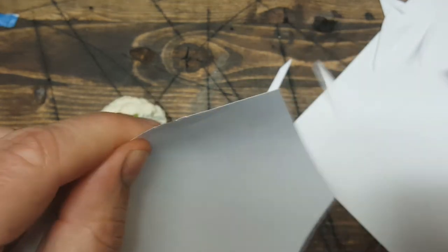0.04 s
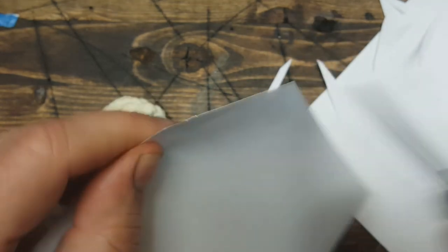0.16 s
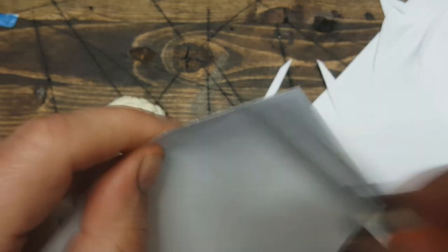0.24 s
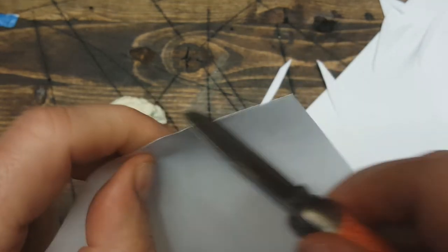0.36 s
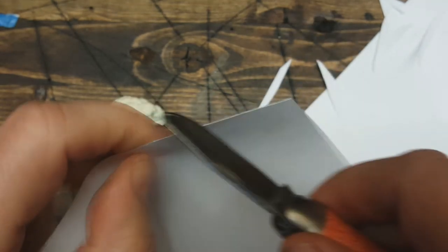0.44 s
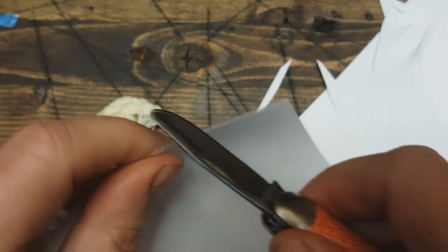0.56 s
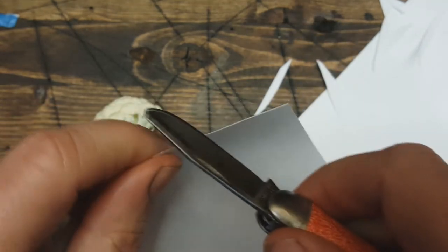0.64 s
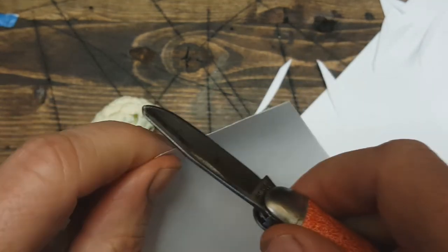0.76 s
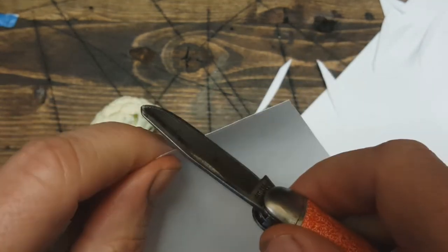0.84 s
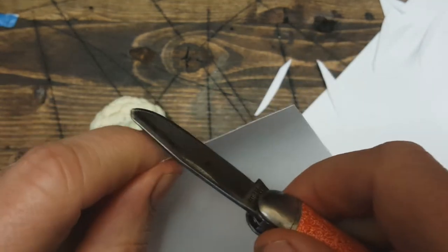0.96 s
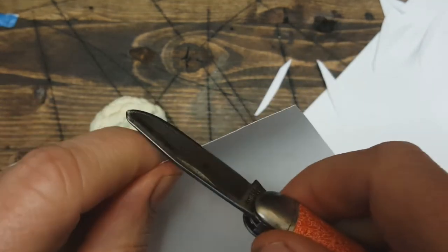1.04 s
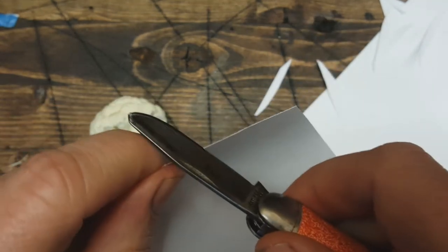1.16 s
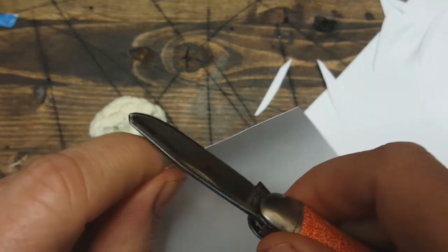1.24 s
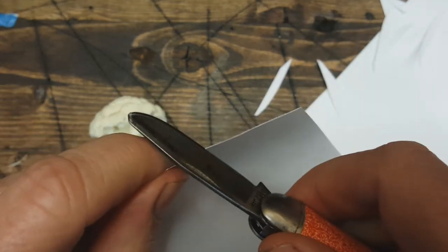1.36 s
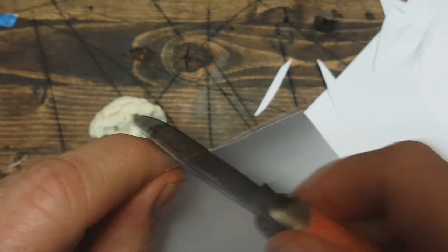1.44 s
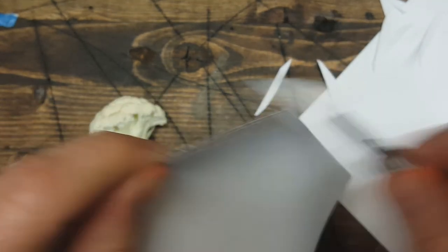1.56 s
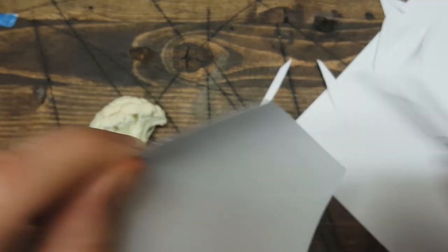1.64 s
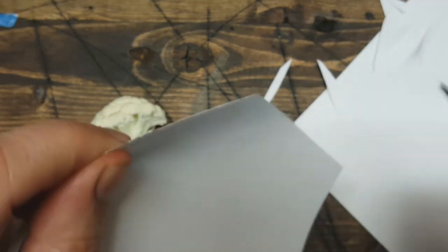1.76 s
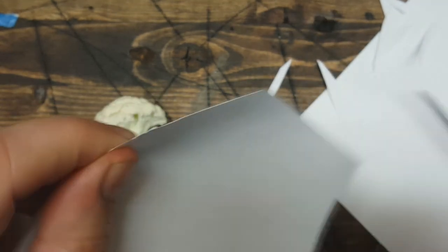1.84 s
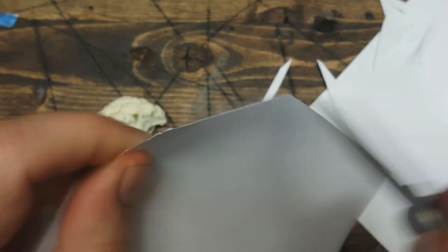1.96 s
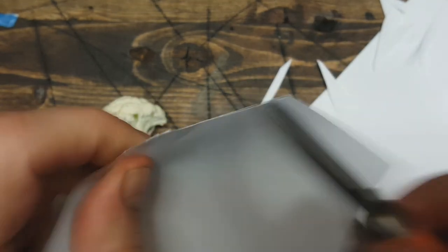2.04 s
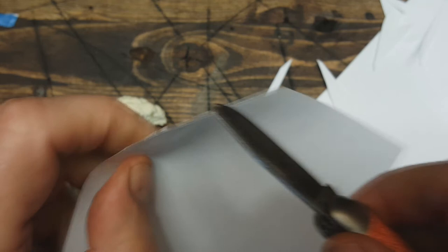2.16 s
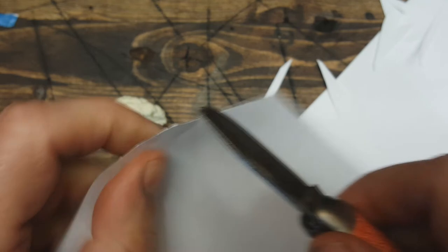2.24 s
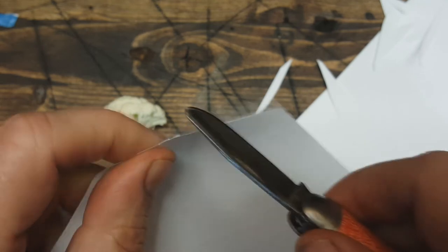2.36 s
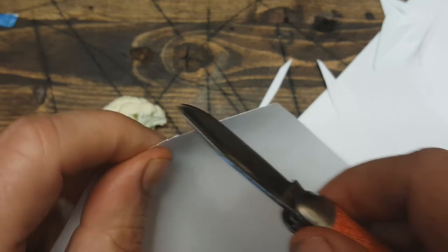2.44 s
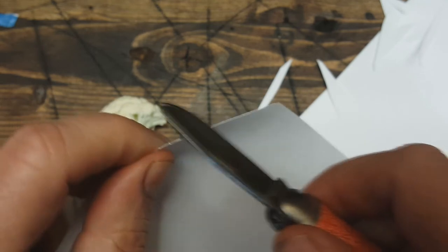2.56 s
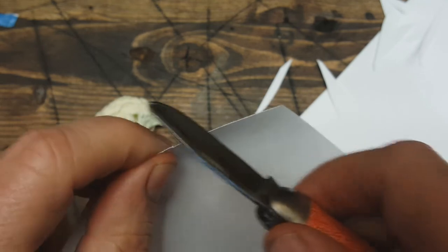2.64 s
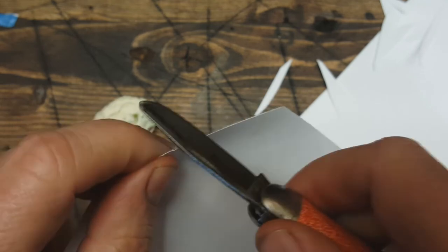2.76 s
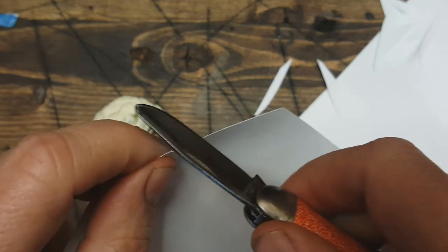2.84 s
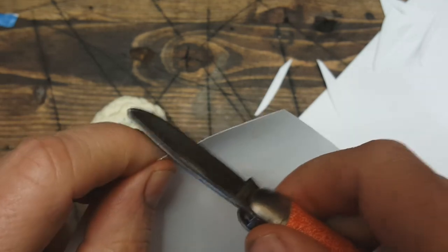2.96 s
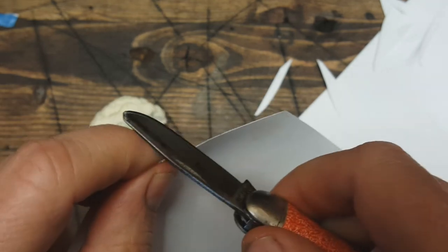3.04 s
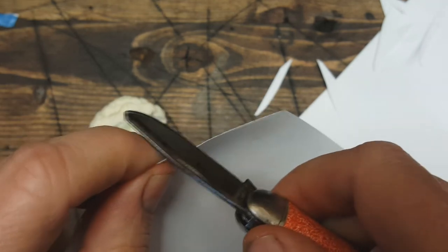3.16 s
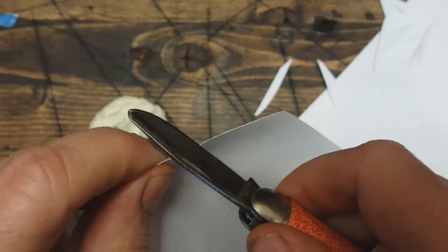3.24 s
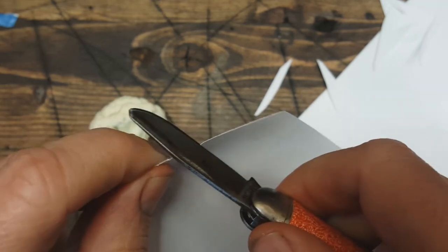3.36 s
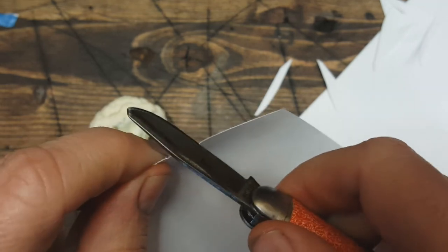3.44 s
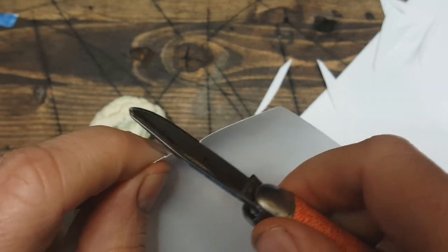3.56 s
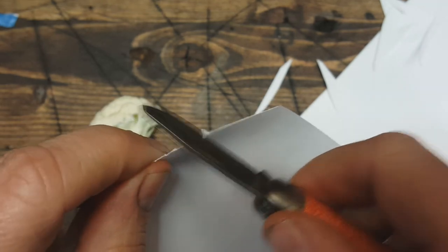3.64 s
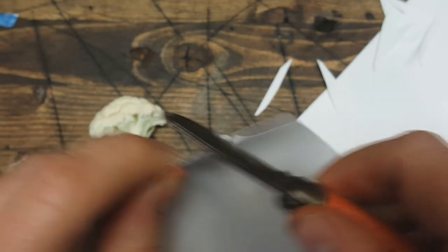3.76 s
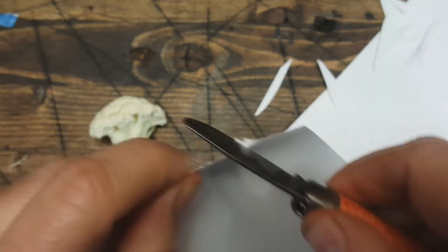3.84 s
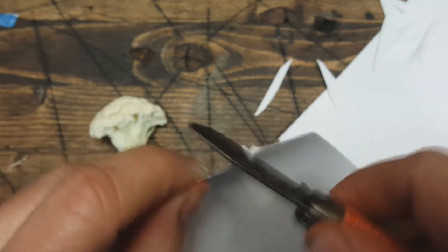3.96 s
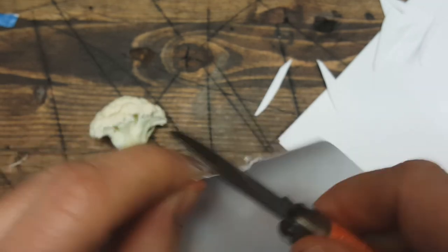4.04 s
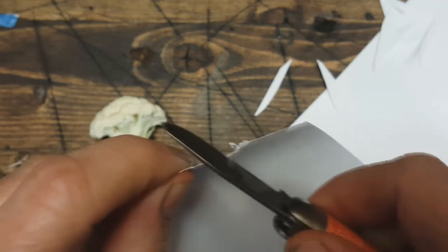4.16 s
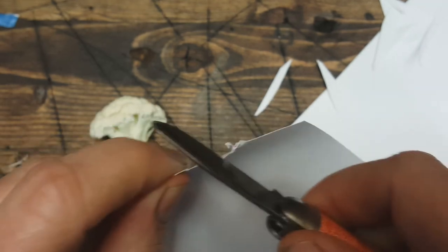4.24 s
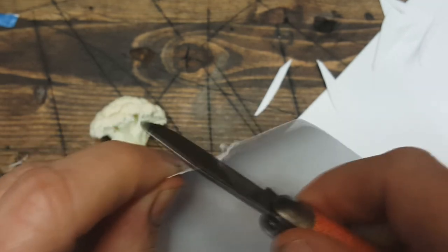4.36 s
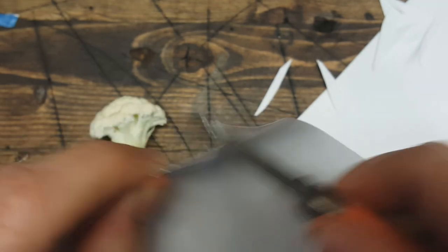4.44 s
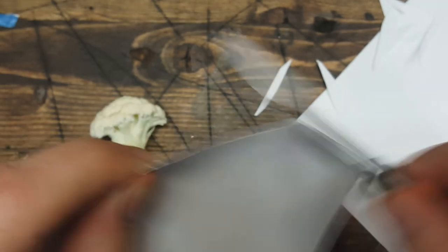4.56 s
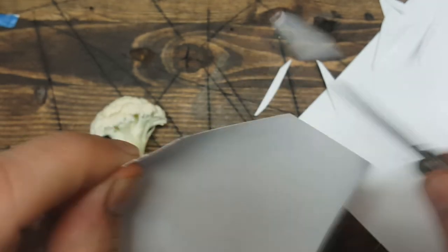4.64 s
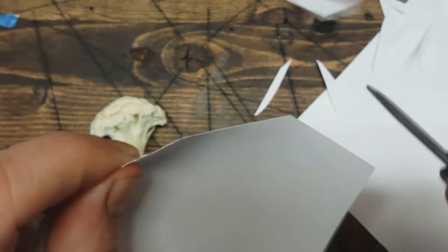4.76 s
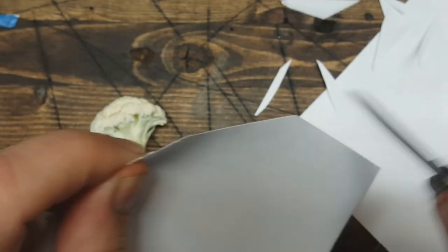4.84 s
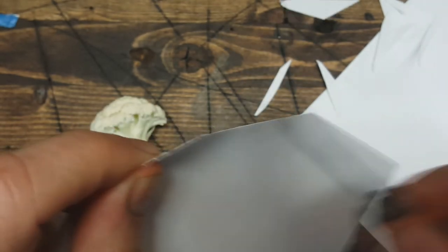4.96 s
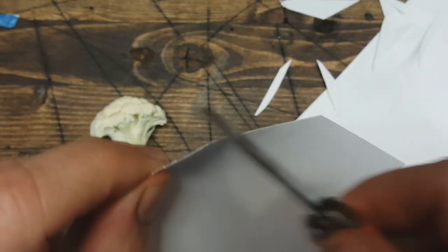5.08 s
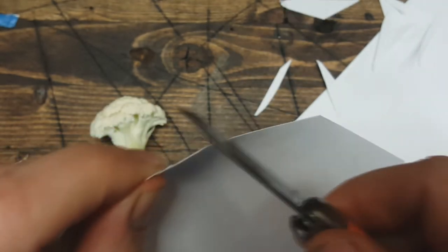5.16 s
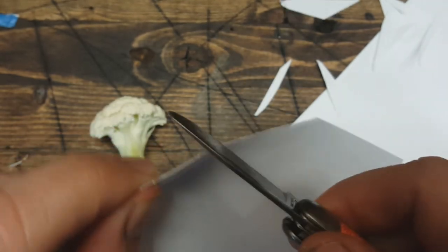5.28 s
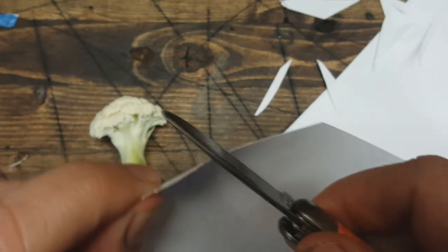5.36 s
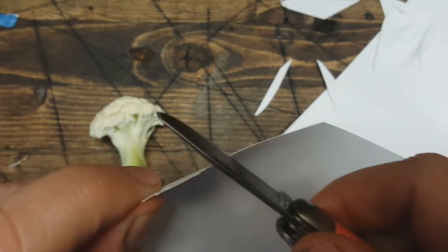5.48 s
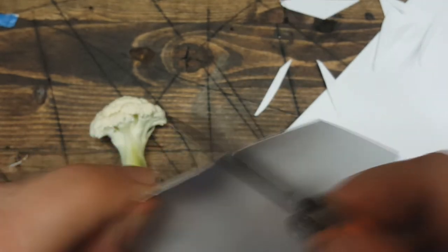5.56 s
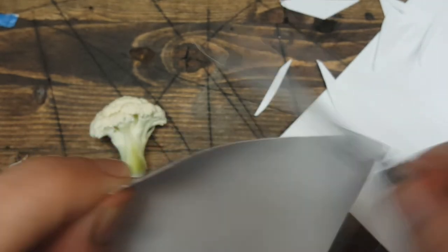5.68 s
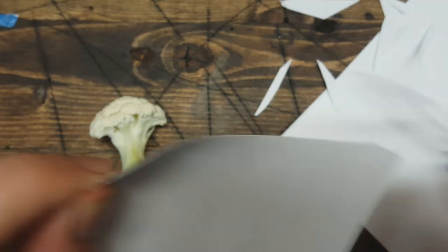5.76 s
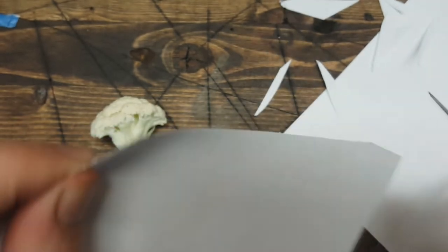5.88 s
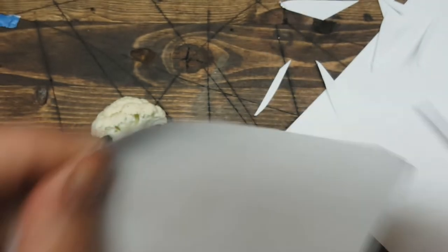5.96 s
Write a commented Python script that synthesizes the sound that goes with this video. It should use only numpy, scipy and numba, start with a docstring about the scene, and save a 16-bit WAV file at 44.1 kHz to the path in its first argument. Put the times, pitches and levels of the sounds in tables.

```python
"""A pocket knife slices strips off a hand-held sheet of paper over a wooden bench, close to a phone.
The edge snaps fibres: a dense random crackle that the sheet radiates with an uneven spectrum.
Between strokes fingers and blade slide on the sheet, tick it in short bursts and knock low modes.
A small room rings briefly (decaying noise bands) over shaped-noise rumble, tyre noise and wavering hums."""
import sys
import numpy as np
from scipy import signal
from scipy.fft import rfft, irfft
from scipy.io import wavfile
from scipy.ndimage import uniform_filter1d
from numba import njit

SR = 44100
rng = np.random.default_rng(int(sys.argv[2]) if len(sys.argv) > 2 else 0)


def digitize_waveform(pressure):
    """Quantize a signal to 16-bit integers and store it at the path in sys.argv[1].

    Rows of a 2-D input are taken as channels; values are limited to [-1, 1].
    """
    field = np.atleast_2d(pressure).T
    bounded = np.clip(field, -1, 1)
    quanta = np.round(bounded * 32767).astype(np.int16)
    wavfile.write(sys.argv[1], SR, quanta)


N = 265129
T = np.arange(N) / SR  # s

# Force spectrum of slides and ticks: (frequency [Hz], density [dB per Hz])
SLIDE_COLOUR = [(120, -37), (250, -22), (580, -12), (1300, -16), (1900, -5), (3000, 0), (4000, -5),
                (6000, -12), (8500, -18.5), (11000, -21), (15700, -37)]


def undb(db):
    """Decibels to gain."""
    return 10 ** (np.asarray(db) / 20)


def unit(x):
    """Scale to rms 1."""
    return x / np.sqrt(np.mean(x ** 2))


def on_log(hz, points):
    """Read (Hz, value) points on a log frequency axis."""
    point_hz, values = np.transpose(points)
    return np.interp(np.log(np.maximum(hz, 1)), np.log(point_hz), values)


def walk(rate_hz):
    """Random levels held 1 / rate_hz s and slewed; rms 1."""
    held = rng.standard_normal(N)[(T * rate_hz).astype(int)]
    return unit(uniform_filter1d(held, max(int(SR / rate_hz), 2)))


@njit
def svf(x, hz, width_hz):
    """State-variable band-pass with a moving centre, gain 1 at the centre."""
    y, band, low = np.empty(len(x)), 0., 0.
    for i in range(len(x)):
        g, k = np.tan(np.pi * hz[i] / SR), width_hz / hz[i]
        v = (band + g * (x[i] - low)) / (1 + g * (g + k))
        low += 2 * g * v
        band = 2 * v - band
        y[i] = k * v
    return y


def background():
    """Rumble, tyre noise and hiss as shaped noise; the low parts swell slowly and flicker."""
    # Noise spectrum: (frequency [Hz], density [dB per Hz])
    spectrum = [(15, -50), (30, -21.5), (50, -17), (80, -5), (140, -7.5), (260, -19), (500, -26),
                (900, -29), (1400, -30.5), (2000, -30.5), (3100, -33), (3900, -40), (6000, -43.5),
                (10000, -44.5), (15700, -48)]
    # Outdoor rumble swell: (time [s], level below 250 Hz [dB], level 250-1500 Hz [dB])
    swell = [(0, 2, 4), (1, 2, 3), (2, 1, 6), (2.998, 2.5, 4), (4, 3, 8.5), (4.799, 4.5, 10.5),
             (5.2, 7, 12.5), (5.5, 10, 12), (6.02, 6.5, 11)]
    level_db = -57.5
    hz = np.linspace(0, SR / 2, N // 2 + 1)
    noise = rfft(rng.standard_normal(N)) * undb(on_log(hz, spectrum))
    noise = noise / np.sqrt(np.mean(irfft(noise, N) ** 2))
    below_250 = 1 / (1 + (hz / 250) ** 6)
    below_1500 = 1 / (1 + (hz / 1500) ** 4)
    s, bass_points_db, mid_points_db = np.transpose(swell)
    bass_db, mid_db = np.interp(T, s, bass_points_db), np.interp(T, s, mid_points_db)
    out = irfft(noise * below_250, N) * undb(bass_db + 1.267 * walk(3))
    out += irfft(noise * (below_1500 - below_250), N) * undb(mid_db + 2.0 * walk(9))
    out += irfft(noise * (1 - below_1500), N) * undb(0.311 * mid_db)
    # tyre noise of distant traffic stands out when the rumble swells
    tyres = unit(svf(rng.standard_normal(N), 760 * (1 + .08 * walk(5.9)), 210.0))
    out += tyres * undb(-24.0 + 1.9 * mid_db + 2.0 * walk(6.6))
    return undb(level_db) * out


def hums():
    """Low gliding tones that swell, fade and waver slightly in level and pitch."""
    # Hums: (start [s], length [s], first pitch [Hz], last pitch [Hz], level at mid-swell [dB rms])
    hum_rows = [(0, 0.67, 138.8, 142.2, -58), (2.205, 0.93, 137.6, 142.4, -53), (4.85, 0.12, 84, 80.2, -54),
                (5.046, 0.43, 123.8, 126, -53), (5.513, 0.98, 123, 126.7, -50)]
    swell_power = 0.54  # exponent of the half-sine swell
    waver_hz, waver_db = 1.486 * walk(8.9), 1.5 * walk(8.3)
    out = 0
    for s, length_s, first_hz, last_hz, db in hum_rows:
        done = np.clip((T - s) / length_s, 0, 1)
        pitch_hz = first_hz + (last_hz - first_hz) * done + waver_hz
        phase = 2 * np.pi * np.cumsum(pitch_hz) / SR
        swell = np.abs(np.sin(np.pi * done)) ** swell_power
        out = out + np.sqrt(2) * swell * undb(db + waver_db) * np.sin(phase)
    return out


def crackle(rate_hz, spread_db, patchy_db, patch_rate_hz):
    """Fibres let go at random moments with uneven strength, in patches."""
    strength = undb(spread_db * rng.exponential(size=N))
    snaps = (rng.random(N) < rate_hz / SR) * rng.choice([-1, 1], N) * strength
    return unit(snaps * undb(patchy_db * walk(patch_rate_hz)))


def split(hz):
    """Gains of four neighbouring bands, low to high; their powers sum to 1."""
    # Band edges: [Hz]
    edges_hz = 1500, 3700, 6600
    below = [0 * hz] + [1 / (1 + (hz / f) ** 12) for f in edges_hz] + [0 * hz + 1]
    return np.sqrt(np.clip(np.diff(below, axis=0), 0, 1))


def causal(gain):
    """Minimum-phase response of unit energy with the shape of the gain curve."""
    size = 2 * (len(gain) - 1)
    cepstrum = irfft(np.log(gain + 1e-4 * gain.max()))
    cepstrum[1:size // 2] *= 2
    cepstrum[size // 2 + 1:] = 0
    return unit(irfft(np.exp(rfft(cepstrum)))) / np.sqrt(size)


def sheet(force, parts_db, colour, ripple_db):
    """The paper radiates the force in four bands; its rippled response changes as it bends between two shapes."""
    # Spectral peaks and dips of the sound, broad and narrow:
    # (frequency [Hz], width [Hz], level relative to the colour [dB])
    peaks = [(622.6, 150, 1), (1217, 150, 1), (2230, 37, 9.5), (2400, 110, 5.5), (2716, 90, 7),
             (3025, 41, 3), (3010, 64, 5.5), (3710, 90, 3), (4500, 110, 2), (5350, 93, 3), (8530, 58, 7),
             (10900, 280, -4)]
    hz = np.linspace(0, SR / 2, 1025)
    db = on_log(hz, colour) + sum(d / (1 + (2 * (hz - f) / w) ** 2) for f, w, d in peaks)
    bend = .5 + .5 * np.tanh(5.4 * walk(15))
    parts = 0
    for share in bend, 1 - bend:
        ripple = unit(uniform_filter1d(rng.standard_normal(len(hz)), size=7))
        shape = undb(db + ripple_db * ripple)
        radiated = [signal.oaconvolve(force * share * undb(part_db), causal(shape * band))[:N]
                    for part_db, band in zip(parts_db, split(hz))]
        parts = parts + np.array(radiated)
    return parts


def spans(tables, fade_s):
    """Join the tables into columns over time, and a gate that is open inside them."""
    rows = np.array(sorted(tuple(row) for table in tables for row in table))
    gate = sum((T >= table[0][0]) & (T < table[-1][0]) for table in tables) > 0
    gate = uniform_filter1d(gate * 1., max(int(fade_s * SR), 1))
    return gate, [np.interp(T, rows[:, 0], column) for column in rows[:, 1:].T]


def bursts(rows, rise_db, fall_db):
    """Each short event climbs to its peak and drops again, at one colour."""
    return [[(s - rise_s, db - rise_db, *rest), (s, db, *rest), (s + fall_s, db - fall_db, *rest)]
            for s, rise_s, fall_s, db, *rest in rows]


def friction(tables, grain, colour, boom_db, bite_db, sizzle_db, ring_db, ring_width_hz,
             broad_db, flicker_db, fade_s):
    """Crackle under the pressure curve, with a resonance that follows the free length of paper."""
    gate, (db, treble_db, hz) = spans(tables, fade_s)
    # the boom grows more slowly than the level: 0.24 dB lost per dB above -31 dB
    boom_share_db = boom_db - 0.24 * (db + 31)
    # 1.96 dB of sizzle per dB of treble
    shares_db = boom_share_db, 0, bite_db + treble_db, sizzle_db + 1.96 * treble_db
    # different areas of the sheet favour different pitches, so each part flickers on its own
    parts_db = [share_db + flicker_db * walk(70) for share_db in shares_db]
    boom, body, bite, sizzle = sheet(grain * gate * undb(db), parts_db, colour, ripple_db=2.25)
    ring = svf(body, hz * (1 + 0.025 * walk(43)), ring_width_hz)
    return boom + undb(broad_db) * body + undb(ring_db) * ring + bite + sizzle


def slides_and_rubs():
    """Skin or the flat of the blade rubs the sheet: soft, patchy crackle under slow pressure curves."""
    # Slides while regripping: (time [s], level [dB], treble [dB], sheet resonance [Hz])
    slide_tables = ([(0.175, -56, -2, 2810), (0.187, -52, -4.5, 2820), (0.225, -55, -1.5, 2700),
                    (0.235, -47.5, -1.5, 2580), (0.317, -54.5, -2.5, 2950), (0.345, -53.5, -1, 2800),
                    (0.415, -43.5, -4.5, 2230), (0.457, -48.5, -5.5, 2390), (0.485, -53.5, -0.5, 2850),
                    (0.529, -40.5, -2.5, 3030), (0.573, -50.5, -3.5, 2980), (0.591, -48, -4, 2730),
                    (0.63, -71, 0, 2590)], [(1.9, -70, 2, 2900), (1.914, -56, -1, 2920),
                    (1.968, -60.5, -4, 2930), (1.996, -46.5, -5.5, 2930), (2.008, -58.5, -4, 2970),
                    (2.036, -47, -3, 3040), (2.066, -47.5, -5.5, 2960), (2.204, -45, -3, 3200),
                    (2.216, -51.5, -2, 2940), (2.266, -36.5, -6.5, 2950), (2.298, -43, -2, 3000),
                    (2.35, -46, -3.5, 2980), (2.358, -53, -2, 3000), (2.385, -48, -9.5, 2930)],
                    [(2.385, -55, -3, 2940), (2.411, -48.5, -3, 2950), (2.447, -60, -3, 2860),
                    (2.513, -49.5, -3, 2730), (2.557, -66, -2.5, 2820), (2.575, -62, -1, 2720),
                    (2.611, -63, -1.5, 3020), (2.629, -45, -5, 3060), (2.651, -68, 1.5, 2910),
                    (2.757, -64.5, -3.5, 2760), (2.78, -80, -5, 2920)])
    # Short rubs: (peak time [s], rise [s], fall [s], level [dB], treble [dB], sheet resonance [Hz])
    rubs = [(.002, 0.0041, 0.081, -50.5, -6.5, 2850), (3.23, 0.005, 0.045, -48.5, -8.5, 2400),
            (3.30, 0.011, .06, -55, -10, 2430), (4.02, 0.012, .014, -58, -6, 2700),
            (4.06, 0.026, 0.056, -45.5, -5, 2400), (4.16, 0.029, 0.029, -50.5, -2.5, 2440),
            (4.195, 0.0069, .025, -52.5, -13, 2460), (4.245, 0.007, 0.029, -50, -20.5, 2350),
            (4.32, 0.078, 0.14, -48.5, -14.5, 2380)]
    grain = crackle(rate_hz=14000, spread_db=2.0, patchy_db=2.0, patch_rate_hz=80)
    return friction([*slide_tables, *bursts(rubs, rise_db=7, fall_db=13.5)], grain, SLIDE_COLOUR,
                    boom_db=-10.5, bite_db=-1.0, sizzle_db=-3.5, ring_db=0.0, ring_width_hz=650.0,
                    broad_db=-11.0, flicker_db=0.66, fade_s=.005)


def room(x):
    """Diffuse tail: noise bands that die at their own rate."""
    # Tail spectrum: (frequency [Hz], level [dB])
    room_colour = [(200, 9.5), (3000, -2), (6000, -3), (9000, -11), (15000, -16)]
    # Tail decay: (frequency [Hz], t60 [s])
    room_decay = [(300, 0.36), (800, 0.28), (2100, 0.37), (5500, 0.3), (10000, 0.11), (15000, 0.1566)]
    level_db, onset_s = -18.5, 0.0018
    t, tail = T[:SR // 2], 0
    for hz in 180 * 2 ** np.arange(0, 6.6, .5):
        band = svf(rng.standard_normal(len(t)), np.full(len(t), hz), hz / 3)
        band = unit(band) * np.sqrt(hz)  # power grows with bandwidth
        tail = tail + band * undb(on_log(hz, room_colour) - 60 * t / on_log(hz, room_decay))
    tail = tail * (1 - np.exp(-t / onset_s))
    return undb(level_db) * signal.oaconvolve(x, tail / np.sqrt(np.sum(tail ** 2)))[:N]


def ticks():
    """Each tick or scuff is a sudden burst of snaps that dies quickly; longer ones also start softer."""
    # Ticks and scuffs: (time [s], level [dB], 60 dB fade [s], boom [dB], treble [dB])
    tick_rows = [(0.0771, -41.5, 0.017, -30, 10), (0.6695, -42.5, 0.038, 3, -21),
                 (0.6987, -44.5, 0.056, -9, -2.5), (0.823, -45, .048, 0, -4.5),
                 (0.847, -49.5, 0.022, 1, -10), (1.077, -52, 0.021, -3, -20), (1.1341, -51.5, 0.028, 2, 4),
                 (1.2975, -48.5, .039, 0.5, -3.5), (1.357, -48, 0.024, -18, -20),
                 (1.4563, -41.5, 0.014, -7, -2), (1.462, -36.5, 0.056, -3, 0),
                 (1.6007, -18, 0.022, -4.5, -18), (1.8281, -56, 0.015, -14, 14.5),
                 (1.8582, -58.5, .018, -11, 8), (1.9844, -49, 0.03, -24, -10), (2.0875, -34, .015, 2, -8),
                 (2.231, -40, 0.024, 5, -9), (2.2442, -39.5, 0.013, 11.5, -16),
                 (2.618, -50.5, 0.033, 10.5, -3), (2.6885, -54, 0.017, 6, -3),
                 (3.226, -46.5, 0.013, 5, -16), (3.2748, -42.5, 0.039, -4, -6.5),
                 (3.2906, -45, 0.064, 3, -3.5), (3.328, -41, 0.06, -14.5, -8),
                 (3.414, -52, 0.02, 4.5, -4.5), (3.5443, -48.5, 0.014, -25.5, -7),
                 (3.5657, -35, 0.059, -11.5, -10), (3.5942, -38.5, 0.046, -8.5, -5.5),
                 (3.606, -45, .045, -8, -6), (3.796, -37, 0.011, -5, -8),
                 (3.8466, -21.5, 0.014, -23.5, -13), (4.381, -33, 0.057, -10, -9),
                 (4.3942, -43, 0.024, -7, -1), (4.4053, -33, 0.029, -16, -5),
                 (4.4212, -22, 0.054, -7.5, -5.5), (4.449, -26, 0.038, -11, -6), (4.765, -49, .018, -3, 0),
                 (5.513, -38.5, 0.038, 0, -25.5), (5.5389, -41.5, 0.01, -15, -3),
                 (5.5654, -33, 0.059, -21, -9.5), (5.615, -18, .03, -24, -3), (5.9774, -51, 0.014, 2, 5),
                 (6.0054, -31.5, 0.0091, -30, -1.5)]
    rise_per_s, sizzle_db = 1, -7.5  # rise [s] = rise_per_s * fade_s ** 2; sizzle relative to treble
    force, parts_db = np.zeros(N), np.zeros((4, N))
    grain = crackle(rate_hz=22000, spread_db=0.5, patchy_db=4, patch_rate_hz=880)
    for s, db, fade_s, boom_db, treble_db in tick_rows:
        i = int(s * SR)
        t = T[i:i + int(2 * fade_s * SR)] - T[i]
        rise = 1 - np.exp(-t / (rise_per_s * fade_s ** 2))
        force[i:i + len(t)] += undb(db - 60 * t / fade_s) * rise
        # the colour holds until the next tick
        parts_db[:, i:] = np.array([[boom_db, 0, treble_db, treble_db + sizzle_db]]).T
    return sum(sheet(force * grain, parts_db, SLIDE_COLOUR, ripple_db=1))


def knocks():
    """The taut sheet pops or a finger taps it: a short smooth push rings a few low modes."""
    # Knocks: (time [s], level before the high-pass [dB], push length [s])
    knock_rows = [(0.484, -34.5, 0.00086), (0.532, -33, 0.00056), (0.6695, -24, 0.00025),
                  (1.254, -41, 0.0024), (2.086, -29.5, 0.0002), (2.24, -40, 0.00044), (2.422, -32, 0.0003),
                  (2.632, -44, 0.00033), (3.698, -24, 0.00074), (3.799, -24, 0.00057),
                  (4.614, -32, 0.00089), (5.76, -9, 0.00028)]
    # Modes: (frequency [Hz], level [dB], t60 [s])
    knock_modes = [(245, -14.5, 0.044), (460, -6, 0.027), (608, 12.5, 0.019), (863, 11.5, 0.022),
                   (1324, -22, 0.00677), (1590, 6.5, 0.013), (2100, -16, 0.036), (2560, -7, 0.051)]
    t = T[:SR // 5]
    ring = sum(undb(db - 60 * t / t60_s) * np.sin(2 * np.pi * hz * t) for hz, db, t60_s in knock_modes)
    out = np.zeros(N + SR)
    for s, db, push_s in knock_rows:
        hit = np.convolve(ring, np.hanning(int(push_s * SR) + 3))
        i = int(s * SR)
        out[i:i + len(hit)] += undb(db) * hit / np.abs(hit).max()
    # a small sheet cannot push slow air
    return signal.sosfilt(signal.butter(2, 170, "high", fs=SR, output="sos"), out[:N])


def cuts():
    """The edge snaps fibres: dense crackle under the curves of full strokes and of brief crackles."""
    # Three full strokes: (time [s], level [dB], treble above the level [dB], sheet resonance [Hz])
    strokes = ([(1.505, -36, -1, 2660), (1.523, -21, -7, 2580), (1.563, -21, 2.5, 2530),
               (1.593, -15.5, -2, 2685), (1.6, -17, -7, 2662)], [(4.461, -26.5, -5.5, 2620),
               (4.477, -22.5, -4, 2600), (4.541, -25.5, -1, 2660), (4.609, -16, -7.5, 3060),
               (4.622, -36, -12, 2910)], [(5.597, -33.5, -6, 2850), (5.619, -20.5, -8, 2660),
               (5.687, -17, -5.5, 2930), (5.725, -16, -4.5, 2940), (5.755, -13.5, -1, 3160),
               (5.768, -16.5, -12.5, 2940)])
    # Brief crackles, some as the blade sets on the edge before a stroke, some in short jerky cuts:
    # (peak time [s], rise [s], fall [s], level [dB], treble [dB], sheet resonance [Hz])
    brief_crackles = [(1.496, 0.011, .009, -34.5, -3.5, 2643), (3.712, 0.065, 0.011, -27, -7, 2360),
                      (3.742, 0.013, 0.013, -38, -7, 2370), (3.799, 0.03, .011, -32, -5.5, 2730),
                      (3.823, 0.0074, 0.0064, -31, -8, 3020), (3.848, 0.019, 0.0058, -32.5, -2.5, 2600),
                      (4.452, 0.021, .009, -29, -9.5, 2400), (5.569, 0.016, 0.03, -41, -6, 2537)]
    # Force spectrum: (frequency [Hz], density [dB per Hz])
    cut_colour = [(88, -59), (150, -37), (326, -19), (683, -10), (1200, -11.5), (1320, -18.5),
                  (1550, -12.5), (1990, -14), (2880, -9), (3640, -14), (4330, -14), (6510, -20),
                  (10600, -11), (15600, -29)]
    grain = crackle(rate_hz=11000, spread_db=2.5, patchy_db=-1.5, patch_rate_hz=300)
    return friction([*strokes, *bursts(brief_crackles, rise_db=17, fall_db=8.5)], grain, cut_colour,
                    boom_db=-11.5, bite_db=1.0, sizzle_db=-4.5, ring_db=-4.5, ring_width_hz=880.0,
                    broad_db=-4.5, flicker_db=1.08, fade_s=0.0046)


def scene():
    """Knife, fingers, ticks and knocks in the room, over the background and hums."""
    near = cuts() + slides_and_rubs() + ticks() + knocks()
    return (near + room(near) + background() + hums())[None]


def record(dry):
    """The phone rounds the loudest peaks and cuts the top steeply."""
    headroom, top_hz = .9, 15700
    rounded = headroom * np.tanh(dry / headroom)
    return signal.sosfilt(signal.ellip(12, .2, 80, top_hz, fs=SR, output="sos"), rounded)


dry = scene()
out = record(dry)
digitize_waveform(out)
```